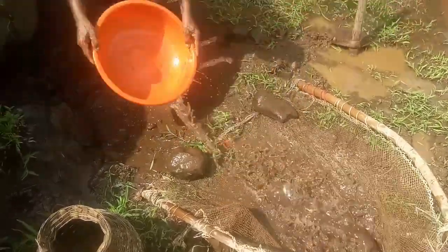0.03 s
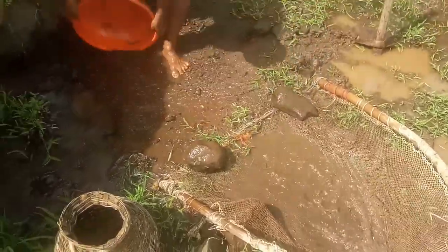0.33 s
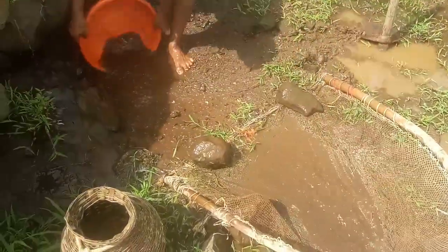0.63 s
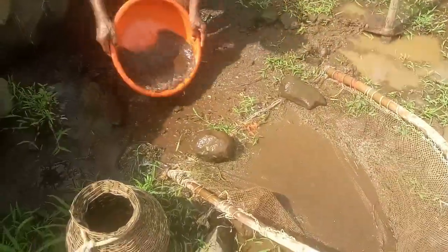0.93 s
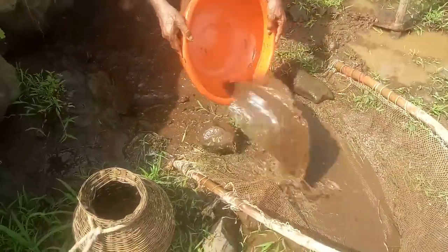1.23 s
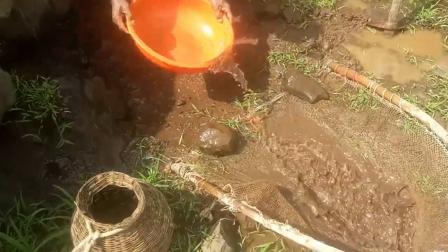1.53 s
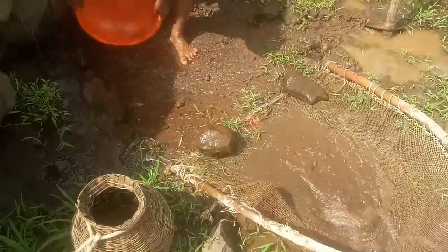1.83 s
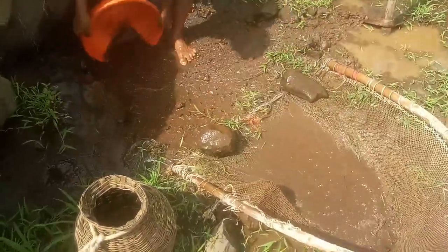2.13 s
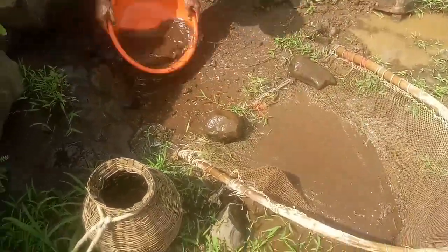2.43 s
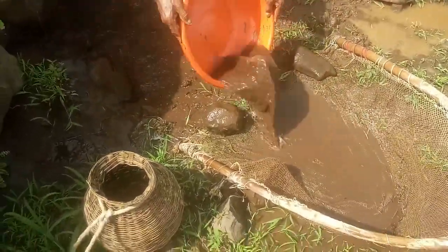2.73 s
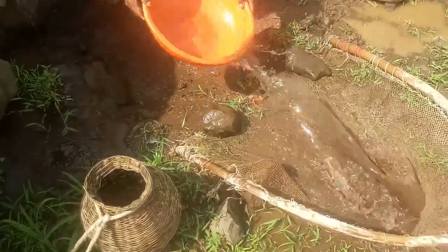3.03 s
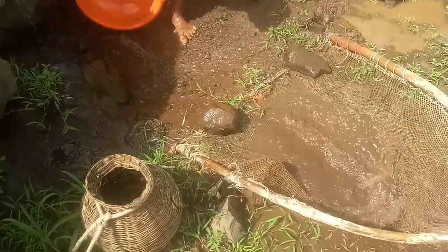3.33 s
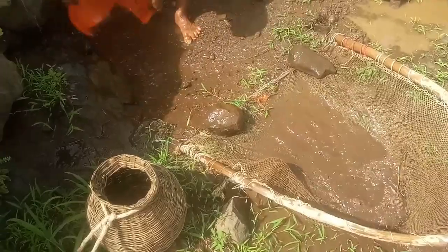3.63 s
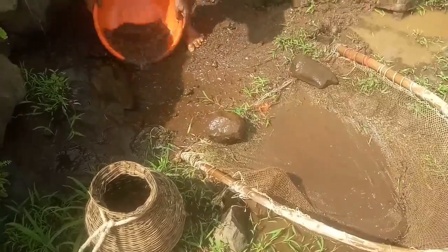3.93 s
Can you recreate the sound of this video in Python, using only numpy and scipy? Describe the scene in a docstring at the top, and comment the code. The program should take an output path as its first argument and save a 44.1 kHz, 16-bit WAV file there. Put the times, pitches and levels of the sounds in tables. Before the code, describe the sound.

Splashes of muddy water land outdoors in three throws, each followed by trickling and the hollow knocks and low booms of a plastic basin dipping into a puddle. Small gulps and slaps come through, all close to the microphone.

```python
"""A plastic basin scoops muddy water from a puddle and throws it on wet ground, three times, outdoors.
The basin knocks and scrapes on the bottom, ringing its resonances, and its floor booms.
Each sheet of water lands as spray and low bubbles; dollops slap down, trapped air gulps out and
the water trickles away. The close microphone overloads on the knocks."""
import sys
import numpy as np
from scipy import signal
from scipy.fft import rfft, irfft, next_fast_len
from scipy.io import wavfile
from scipy.ndimage import uniform_filter1d, minimum_filter1d, map_coordinates

SR = 44100
rng = np.random.default_rng(int(sys.argv[2]) if len(sys.argv) > 2 else 0)


def output_pcm(signal):
    """Save a mono or channel-first signal as 16-bit PCM at the path in sys.argv[1].

    Samples are clipped to [-1, 1] before scaling.
    """
    pcm = np.clip(np.atleast_2d(signal).T, -1, 1) * 32767
    wavfile.write(sys.argv[1], SR, np.round(pcm).astype(np.int16))


N = 176400

# basin hits the ground: start_s, thump_db, hollow_db, clack_db, t60_s
BASIN_KNOCKS = [(.496, -29, -7, -10, 0.14), (.507, -4.5, -5.5, -4, 0.053), (0.554, -19, -23, -28, 0.21),
                (0.682, -3, -0.5, -5, 0.015), (0.69, -8, -2.5, -6.5, 0.072), (.718, -7.5, -5, -10, 0.066),
                (1.904, -21.5, -21, -15.5, 0.095), (1.985, -12.5, -6.5, -9.5, 0.047),
                (2.013, -20.5, -22, -28.5, 0.18), (2.11, -2, 0.5, 4.5, 0.033),
                (2.148, -12.5, -12.5, -7.5, .068), (2.216, -15, -14, -13.5, 0.12),
                (2.249, -16.5, -13, -10, 0.098), (2.265, -7, -9.5, -18, .038),
                (2.336, -18.5, -7, -6.5, 0.057), (2.485, -40, -24, -16.5, 0.059),
                (2.8, -26.5, -37, -19, 0.09), (3.529, -6, -11.5, -15, 0.063),
                (3.556, -15, -1.5, -7.5, 0.03), (3.630, -3.5, -7.5, -11, 0.063),
                (3.669, -1.5, -8.5, 0, 0.047), (3.818, 6, 2, 4.5, 0.049)]
# basin floor, lower when loaded: start_s, pitch_hz, level_db, t60_s
FLOOR_BOOMS = [(0.722, 196, -4.5, 0.19), (2.11, 154.5, -12, 0.35), (2.484, 148, -25, 0.27),
               (3.557, 166, -17, 0.23), (3.668, 169, -4, 0.24), (3.822, 167.5, -1, 0.24)]
# low, middle and high basin resonances: centre_hz, width_hz, gain_db
THUMP_MODES = [(107, 39, -0.5), (157.5, 54, -1), (251, 104, -0.5), (395, 130, -3.5)]
HOLLOW_MODES = [(707, 150, 6.5), (1040, 117, -1)]
CLACK_MODES = [(1350, 114, 8.5), (1795, 400, -2.5), (2353, 310, -1.5), (4400, 3300, -43)]
# sheets landing, water rushing into the basin; one curve each: time_s, spray_db, bubbling_db
THROW_CURVES = [
    [(0, -19.5, -32), (.09, -16.5, -24), (.128, -8.5, -15.5), (.19, -21.5, -30.5), (.29, -18, -36),
     (.35, -25.5, -32.5)],
    [(1.27, -31.5, -40.5), (1.36, -22.5, -34), (1.51, -21, -23), (1.615, -14.5, -18), (1.645, -21.5, -31),
     (1.76, -33, -40.5)],
    [(2.88, -31, -39), (2.955, -22.5, -54), (3.065, -21.5, -24), (3.088, -13.5, -14.5), (3.115, -16, -16.5),
     (3.15, -19, -28), (3.18, -15.5, -21.5), (3.29, -26.5, -42)],
]
SCOOP_CURVES = [
    [(2.06, -69, -29), (2.2, -27, -31), (2.23, -22.5, -29), (2.31, -16.5, -12.5), (2.39, -19, -22),
     (2.44, -29, -39)],
    [(3.68, -37, -32), (3.76, -30.5, -27.5)],
]
# trapped air escaping, single clear bubbles: start_s, pitch_hz, level_db
AIR_GULPS = [(.122, 526, -7.5), (.399, 750, -16), (.506, 307, 0.5), (.692, 755, 2), (.718, 382, 1),
             (1.5, 530, -12.5), (2.11, 318, 4), (2.336, 359, 3), (2.485, 353, -8), (3.101, 596, 2),
             (3.529, 312, -2.5), (3.644, 429, -2.5)]
CLEAR_PLOPS = [(.101, 2300, -5), (.421, 1334, -15.5), (1.804, 1726, -5)]
# dollops on wet ground or the basin: start_s, level_db, length_s
DOLLOP_SLAPS = [(0.218, -17.5, 0.017), (1.166, -18, 0.019), (1.197, -15.5, 0.0045), (1.792, -11, 0.011),
                (1.81, -20, 0.021), (1.892, -20.5, 0.033), (2.278, -11, 0.0012), (2.386, -10.5, 0.0037),
                (2.42, -10, 0.013), (3.332, -16.5, 0.038), (3.477, -20, 0.01)]
# water draining over mud: time_s, level_db
RUNOFF_CURVE = [(.43, -29.5), (.78, -33), (.98, -27), (1.09, -31.5), (1.88, -28.5), (2.06, -29.5),
                (2.55, -22), (2.77, -30), (3.4, -29.5), (3.8, -40), (3.92, -28.5)]
# colour of each water sound and of the microphone: freq_hz, gain_db
SPRAY_EQ = [(200, -6), (600, -9), (1200, -.5), (2400, 2.5), (4400, -3.5), (12000, 1)]
BUBBLING_EQ = [(30, -19), (170, -5.5), (520, -4), (1100, -9), (1500, -8.5), (4000, -30.5)]
SLAP_EQ = [(100, -9), (700, -11.5), (1800, -4), (5500, -3), (12000, 0)]
TRICKLE_EQ = [(30, -25), (250, 7), (700, -4), (1400, -2), (2600, -5), (12000, -0.5)]
MIC_EQ = [(3400, 0), (4400, 3.5), (5100, -1), (6700, -3), (8200, -18.5), (13700, -22.5), (14800, -13)]

LEAD_S, LEAD_DB = 0.016, -22  # water squeezed out just before each contact
THROW_LOW_HZ, SCOOP_LOW_HZ = 327.7, 141.7  # largest bubbles: on flat ground, in the basin
LN_1000 = np.log(1000)  # 60 dB of decay


def basin_knocks(skirt_ratio=1.93):
    """Each contact drives three groups of resonances in the plastic."""
    out = np.zeros(N)
    for start_s, *levels_db, t60_s in BASIN_KNOCKS:
        hit, env = contact(t60_s)
        for modes, level_db in zip((THUMP_MODES, HOLLOW_MODES, CLACK_MODES), levels_db):
            edges_hz = [modes[0][0] / skirt_ratio, min(modes[-1][0] * skirt_ratio, SR / 4)]
            bandpass = signal.butter(2, edges_hz, "band", fs=SR, output="sos")
            ring = signal.sosfilt(bandpass, resonate(hit, modes))
            add(out, start_s - LEAD_S, amp(level_db) * unit(ring) * rms(env))
    return out


def contact(t60_s, attack_s=0.000861, grit=0.42, strike_db=-11):
    """Soft lead-in, firm strike, dying grit; returns the force and its envelope."""
    t = np.arange(SR // 4) / SR
    after_s = np.maximum(0, t - LEAD_S)
    lead_in = amp(LEAD_DB) * np.minimum(1, t / LEAD_S)
    env = decay(after_s, t60_s) * np.maximum(1 - np.exp(-after_s / attack_s), lead_in)
    hit = env * rng.standard_normal(len(t)) * np.exp(grit * rng.standard_normal(len(t)))
    hit[int((LEAD_S + 2 * attack_s) * SR)] += amp(strike_db) * np.linalg.norm(hit)
    return hit, env


def floor_booms(attack_s=0.0055, waver=0.018, low_ratio=0.616, low_db=-3.5):
    """The basin floor rings at a wavering pitch, with a lower, shorter mode."""
    out, t = np.zeros(N), np.arange(SR // 2) / SR
    for start_s, pitch_hz, level_db, t60_s in FLOOR_BOOMS:
        phase = 2 * np.pi * np.cumsum(pitch_hz * (1 + waver * wobble(50)[:len(t)])) / SR
        fade = decay(t, t60_s)
        ring = np.sin(phase) + amp(low_db) * fade * np.sin(low_ratio * phase)
        add(out, start_s, amp(level_db) * fade * (1 - np.exp(-t / attack_s)) * ring)
    return out


def splashing(flicker_db=1.1):
    """Throws and scoops: spray over larger bubbles, deepest inside the basin."""
    spray = unit(coloured(droplets(), SPRAY_EQ) * amp(flicker_db * (wobble(70) + wobble(350))))
    out = np.zeros(N)
    for curves, low_hz in ((THROW_CURVES, THROW_LOW_HZ), (SCOOP_CURVES, SCOOP_LOW_HZ)):
        pockets = bubbles(380, low_hz, 2137, cycles=22, spread_db=2.5, rise=0.41, samples=2048)
        bubbling = unit(coloured(pockets + hiss(-12), BUBBLING_EQ))
        out += sum(spray * curve_gain(rows, 1) + bubbling * curve_gain(rows, 2) for rows in curves)
    return out


def droplets():
    """Breaking water: dense small bubbles in a fine hiss."""
    return bubbles(3200, 700, 10000, cycles=27, spread_db=3, rise=0.1, samples=1024) + hiss(-4)


def bubbles(per_s, low_hz, high_hz, cycles, spread_db, rise, samples):
    """Bubble cloud: damped rising sines, roughly flat spectrum, rms 1."""
    when, pitch, life, loudness = rng.random((int(per_s * N / SR), 4)).T[:, :, None]
    pitch_hz = low_hz * (high_hz / low_hz) ** pitch
    t60_s = np.minimum(cycles * (0.5 + life) / pitch_hz, samples / SR)
    t = np.arange(samples) / SR
    age = t / t60_s
    strength = amp(-spread_db * np.log(0.02 + loudness)) * np.sqrt(pitch_hz / t60_s)
    env = decay(t, t60_s) * (1 - np.exp(-20 * age))
    phase = 2 * np.pi * pitch_hz * t * (1 + rise * np.minimum(age, 1) / 2)
    rings = strength * env * np.sin(phase)
    index = (when * N).astype(int) + np.arange(samples)
    return unit(np.bincount(index.ravel(), rings.ravel(), N)[:N])


def single_bubbles(rows, cycles, rise):
    """Each bubble rings, rising in pitch as it dies."""
    out, t = np.zeros(N), np.arange(SR // 6) / SR
    for start_s, pitch_hz, level_db in rows:
        t60_s = cycles / pitch_hz
        env = decay(t, t60_s) * (1 - np.exp(-pitch_hz * t))
        phase = 2 * np.pi * pitch_hz * t * (1 + rise * t / t60_s / 2)
        add(out, start_s, amp(level_db) * env * np.sin(phase))
    return out


def slaps(t60_s=0.093, flicker_db=0.99):
    """Each dollop swells into a spatter, holds while it lands, then falls away."""
    out, t = np.zeros(N), np.arange(SR // 6) / SR
    drops = droplets()
    for start_s, level_db, length_s in DOLLOP_SLAPS:
        swell = np.sin(np.pi / 2 * np.minimum(1, 2 * t / length_s))
        env = swell * decay(np.maximum(0, t - length_s), t60_s)
        spatter = env * drops[int(start_s * SR):][:len(t)] * amp(flicker_db * wobble(380)[:len(t)])
        add(out, start_s, amp(level_db) * unit(coloured(spatter, SLAP_EQ)) * rms(env))
    return out


def runoff(clump_db=3.5):
    """Water drains through mud: drips, clumps of fizz, hiss."""
    drips = bubbles(600, 500, 5000, cycles=20, spread_db=3.8, rise=0.12, samples=1536)
    fizz = bubbles(2500, 1500, 16000, cycles=12, spread_db=4.5, rise=0, samples=256)
    fizz *= amp(clump_db * wobble(70))
    trickle = unit(coloured(drips + amp(-5.5) * fizz + hiss(2), TRICKLE_EQ))
    return trickle * curve_gain(RUNOFF_CURVE, 1)


def reflections(x, level_db=-12, t60_s=0.19):
    """Faint answer from the ground and banks."""
    t = np.arange(SR // 3) / SR
    tail = rng.standard_normal(len(t)) * decay(t, t60_s)
    return amp(level_db) * signal.fftconvolve(x, tail / np.linalg.norm(tail))[:N]


def amp(db):
    return 10 ** (np.asarray(db) / 20)


def rms(x):
    return np.sqrt(np.mean(x ** 2) + 1e-20)


def unit(x):
    return x / rms(x)


def decay(t, t60_s):
    return np.exp(-LN_1000 * t / t60_s)


def hiss(level_db):
    return amp(level_db) * rng.standard_normal(N)


def wobble(rate_hz):
    """Smooth random curve."""
    knots = rng.standard_normal(int(N * rate_hz / SR) + 4)
    return map_coordinates(knots, [np.arange(N) * rate_hz / SR])


def curve_gain(rows, column, edge_s=0.12):
    """Gain along a dB curve, fading outside its ends."""
    time_s, level_db = np.transpose(rows)[[0, column]]
    t = np.arange(N) / SR
    outside_s = np.maximum(0, np.maximum(time_s[0] - t, t - time_s[-1]))
    return amp(np.interp(t, time_s, level_db)) * np.exp(-outside_s / edge_s)


def add(track, start_s, sound):
    i = int(round(start_s * SR))
    track[i:i + len(sound)] += sound[:max(0, N - i)]


def filtered(x, response):
    """Apply a complex frequency response."""
    size = next_fast_len(len(x) + 8192)
    return irfft(rfft(x, size) * response(np.fft.rfftfreq(size, 1 / SR)), size)[:len(x)]


def coloured(x, eq):
    """Minimum-phase filter through the EQ points."""
    freq_hz, gain_db = np.transpose(eq)
    bins_hz = np.fft.rfftfreq(4096, 1 / SR)
    cepstrum = irfft(np.log(amp(np.interp(np.log(bins_hz + 1), np.log(freq_hz), gain_db))))
    half = len(cepstrum) // 2
    cepstrum[1:half] *= 2
    cepstrum[half + 1:] = 0
    return signal.fftconvolve(x, irfft(np.exp(rfft(cepstrum))))[:len(x)]


def resonate(x, modes):
    """Parallel resonances of alternating sign."""
    return filtered(x, lambda hz: sum(
        (-1) ** k * amp(gain_db) * 1j * hz * width_hz / (centre_hz ** 2 - hz ** 2 + 1j * hz * width_hz)
        for k, (centre_hz, width_hz, gain_db) in enumerate(modes)))


def scene():
    """Basin, water and reflections, mono."""
    direct = basin_knocks() + floor_booms() + splashing() + runoff() + slaps()
    direct += single_bubbles(AIR_GULPS, cycles=25, rise=0.33)
    direct += single_bubbles(CLEAR_PLOPS, cycles=76, rise=0.13)
    return (direct + reflections(direct))[None]


def record(dry):
    """The microphone dulls the top; a limiter ducks peaks over full scale; a low-pass follows."""
    hold_s, release_db_per_s, top_hz = 0.0011, 199, 15650
    x, hold = coloured(dry[0], MIC_EQ), int(hold_s * SR)
    needed_db = 20 * np.log10(minimum_filter1d(np.minimum(1, 1 / (np.abs(x) + 1e-9)), hold))
    recovery_db = release_db_per_s * np.arange(N) / SR
    gain_db = np.minimum.accumulate(needed_db - recovery_db) + recovery_db
    limited = x * uniform_filter1d(amp(gain_db), hold)
    return filtered(limited, lambda hz: hz < top_hz)[None]


dry = scene()
out = record(dry)
output_pcm(out)
```